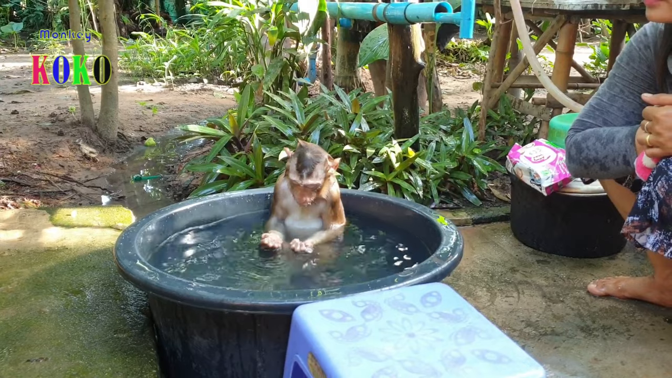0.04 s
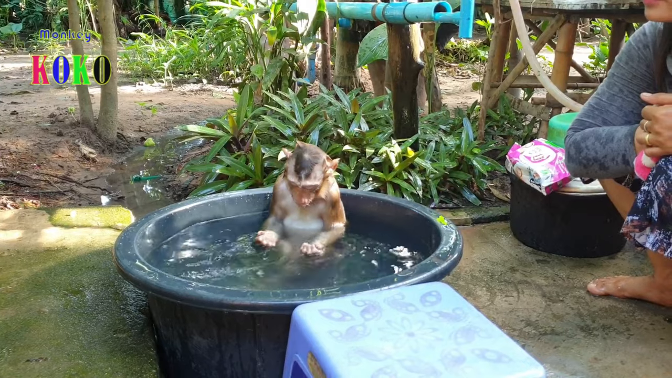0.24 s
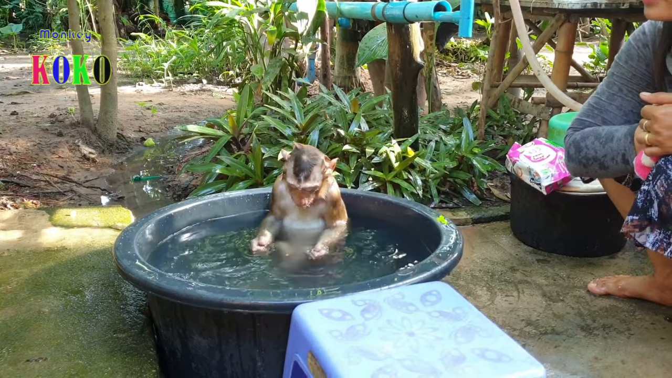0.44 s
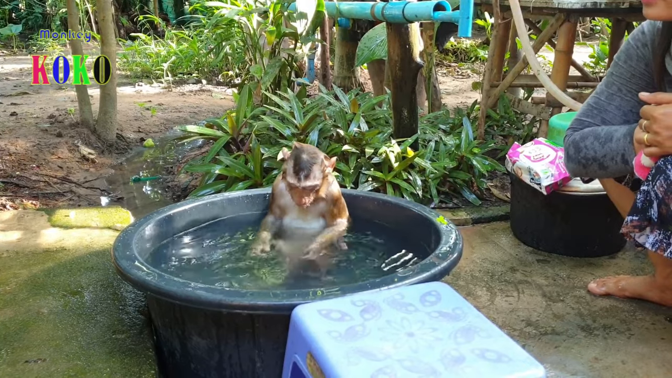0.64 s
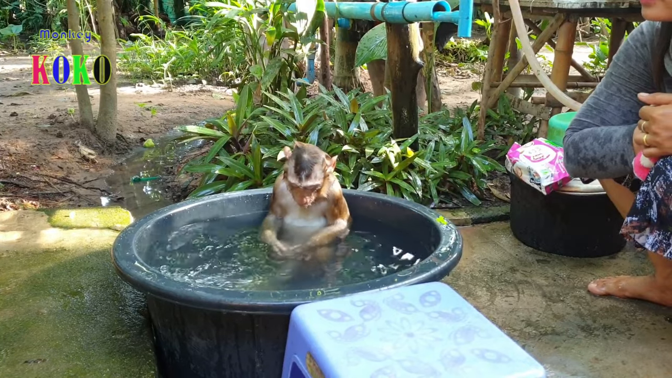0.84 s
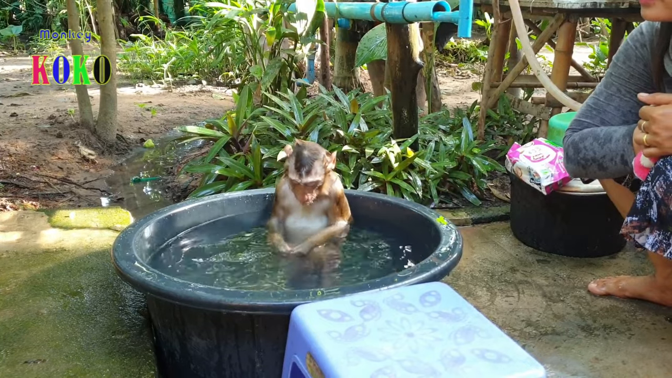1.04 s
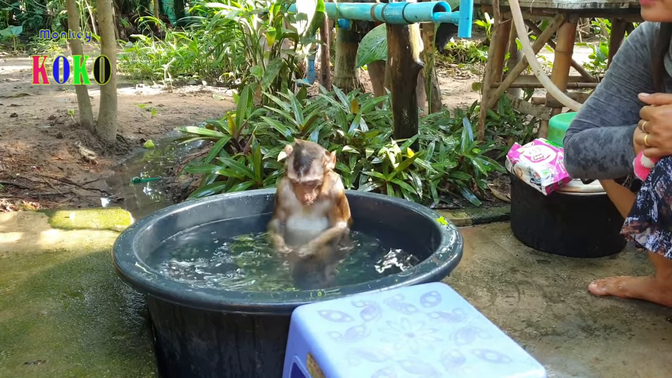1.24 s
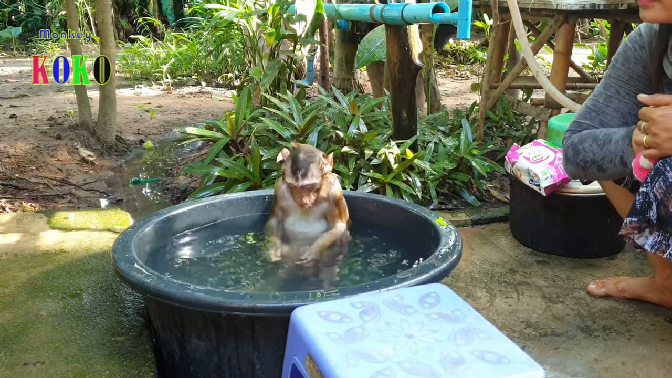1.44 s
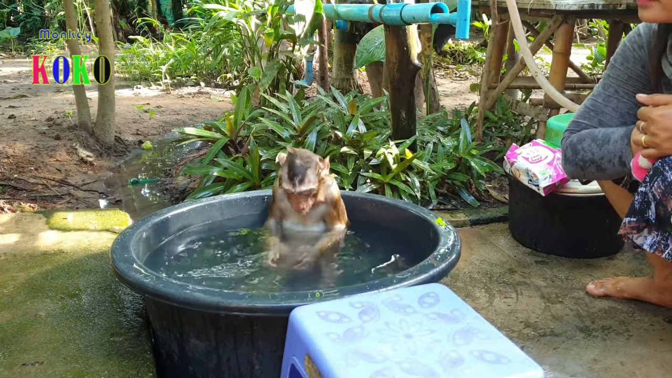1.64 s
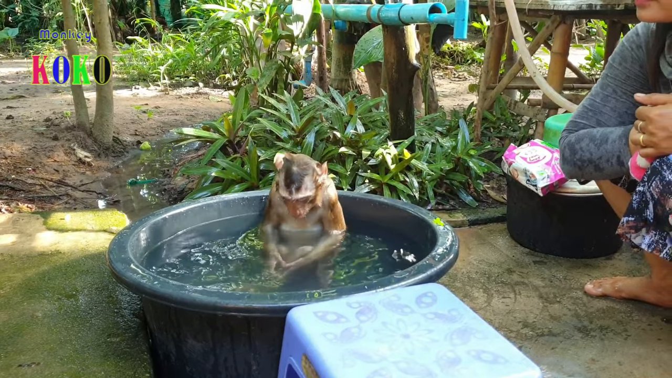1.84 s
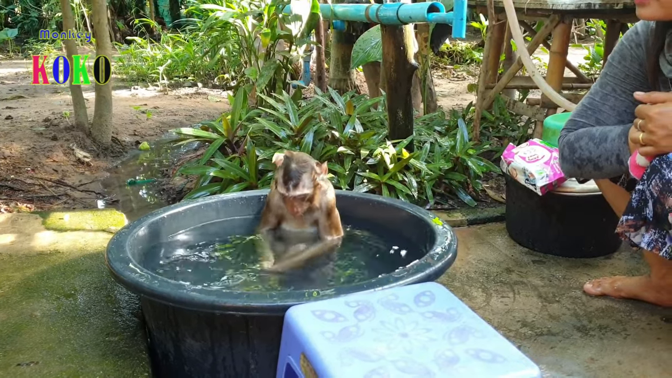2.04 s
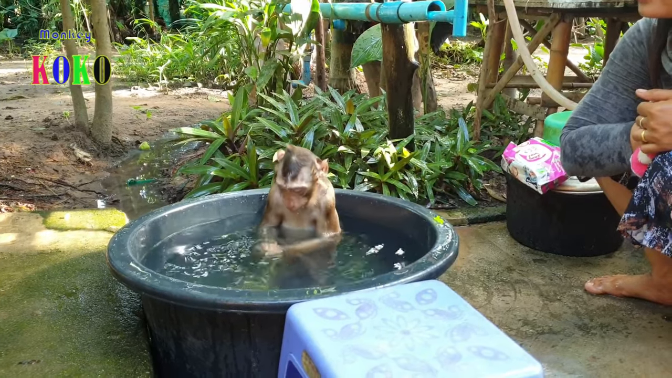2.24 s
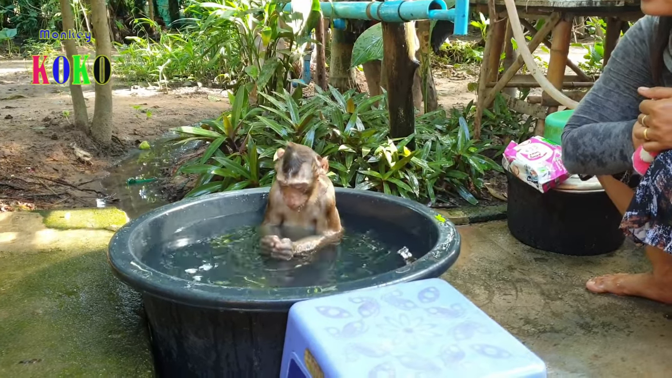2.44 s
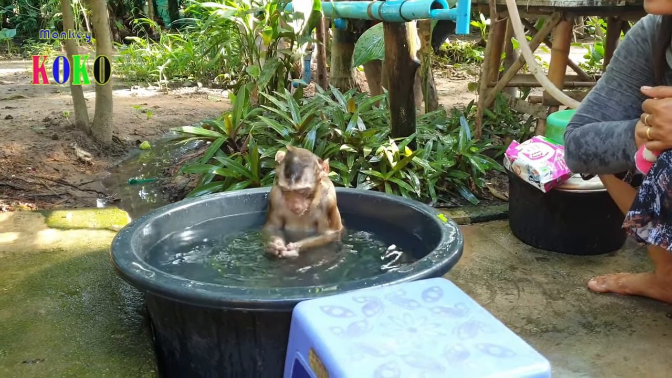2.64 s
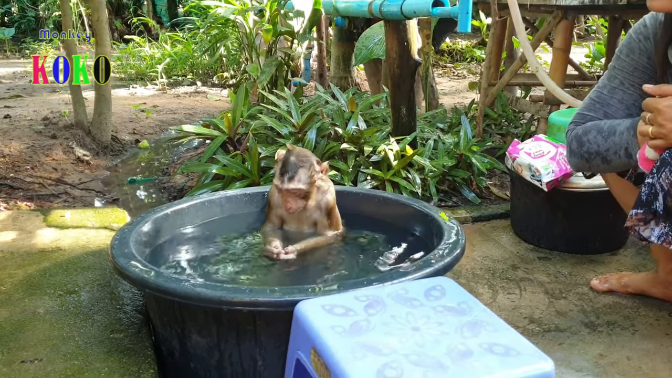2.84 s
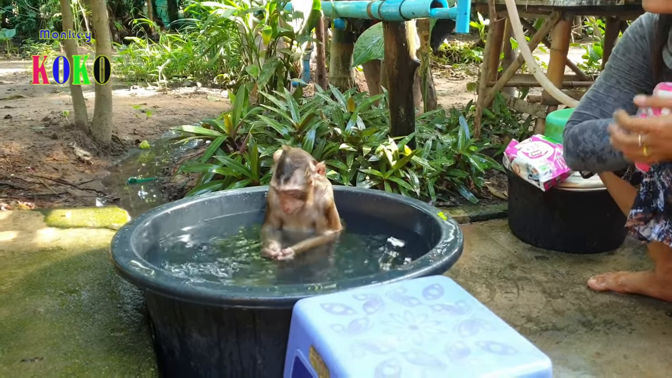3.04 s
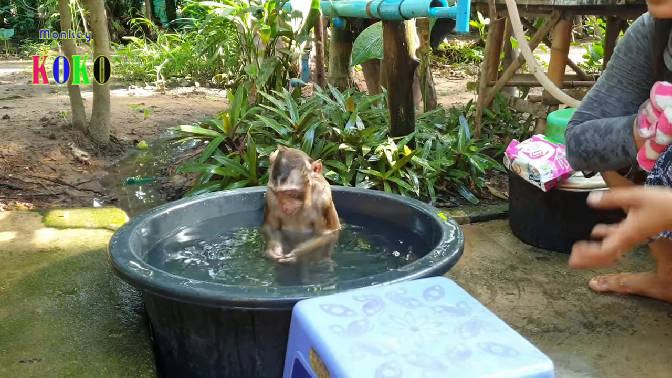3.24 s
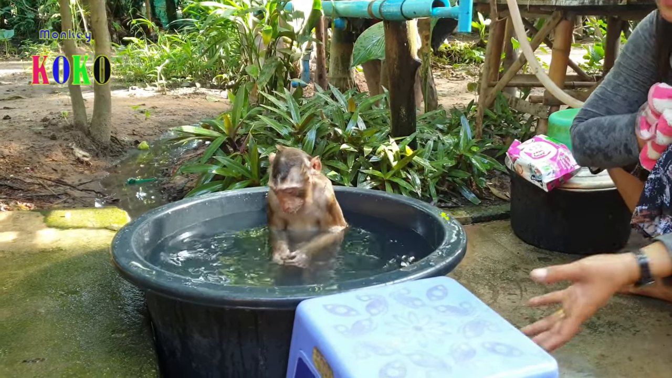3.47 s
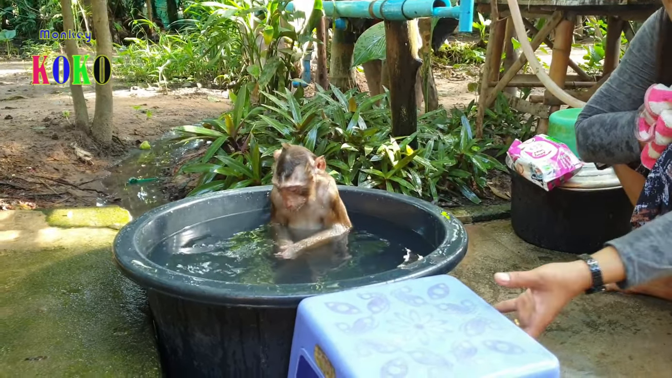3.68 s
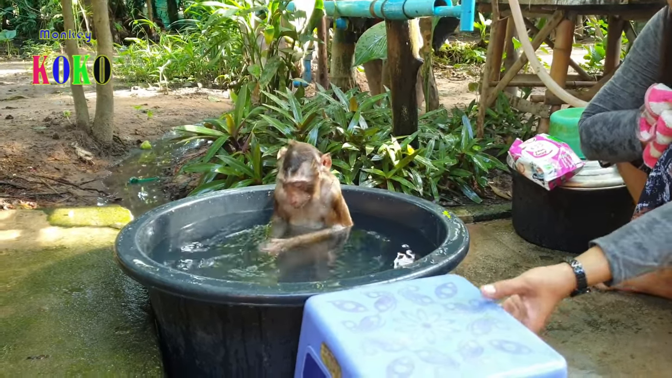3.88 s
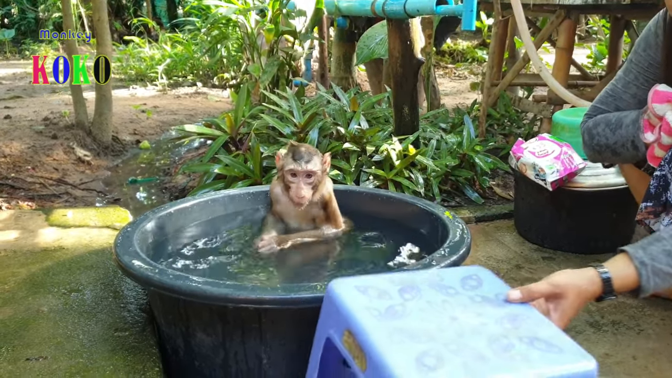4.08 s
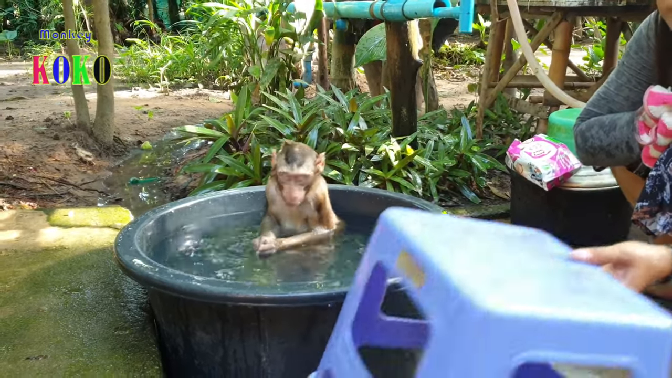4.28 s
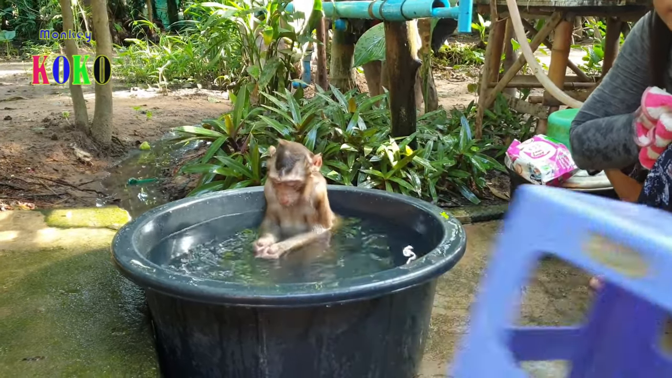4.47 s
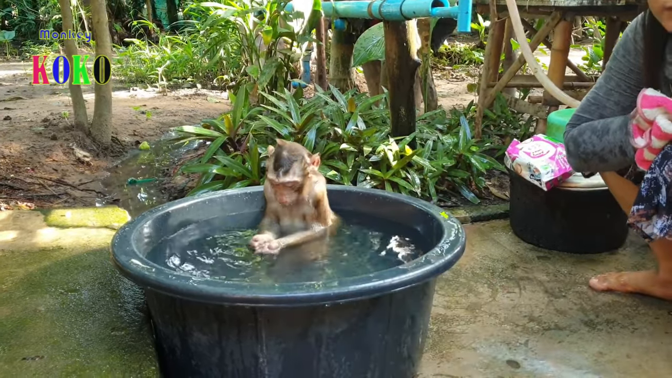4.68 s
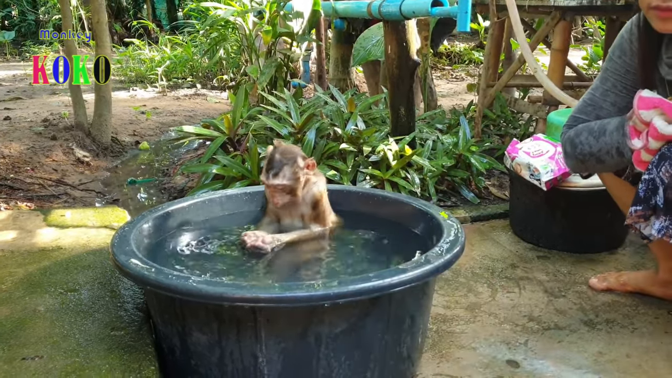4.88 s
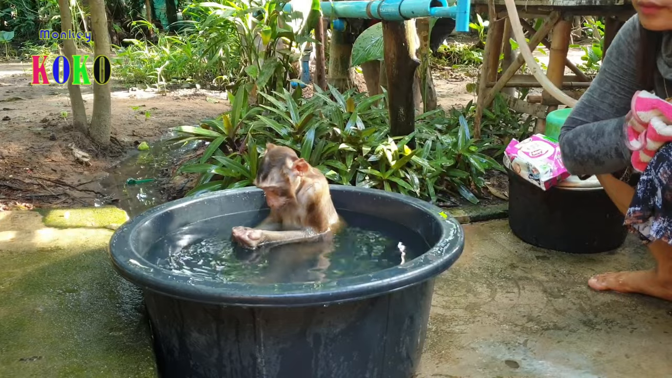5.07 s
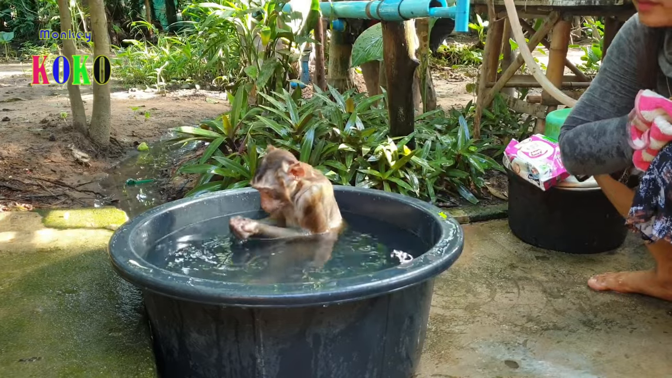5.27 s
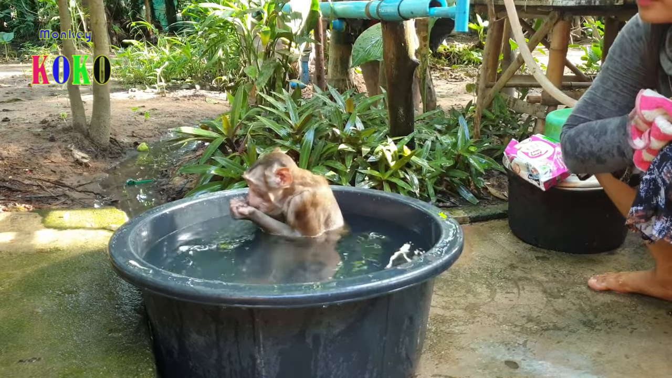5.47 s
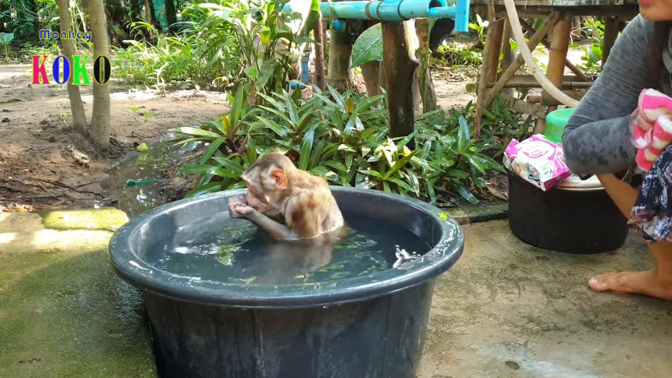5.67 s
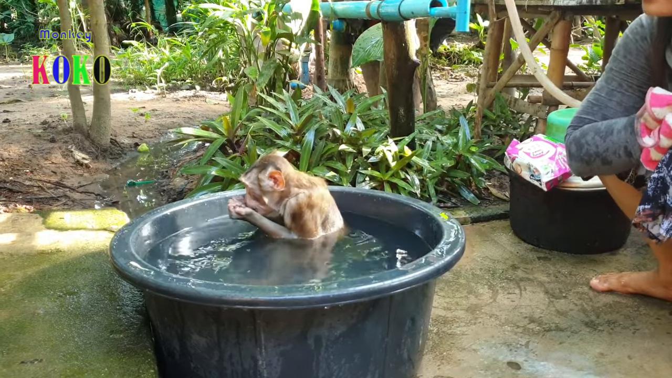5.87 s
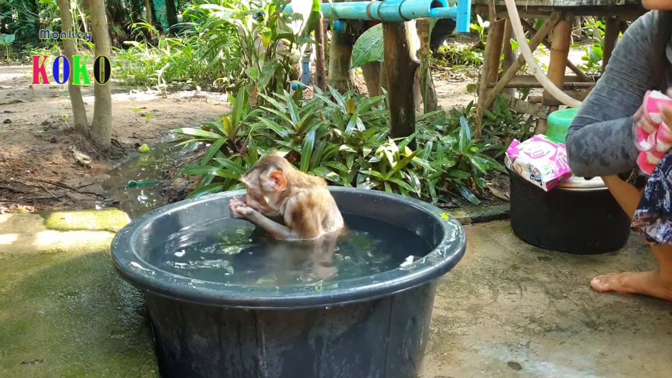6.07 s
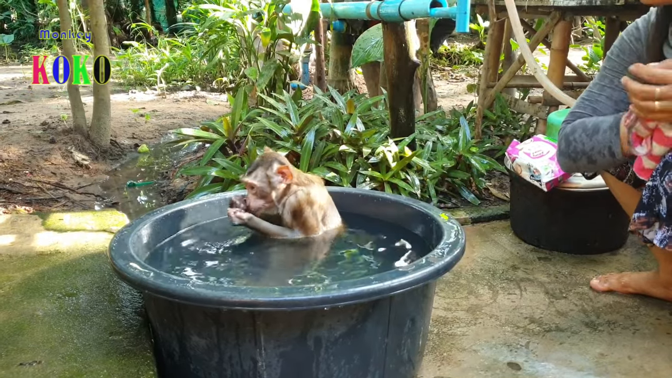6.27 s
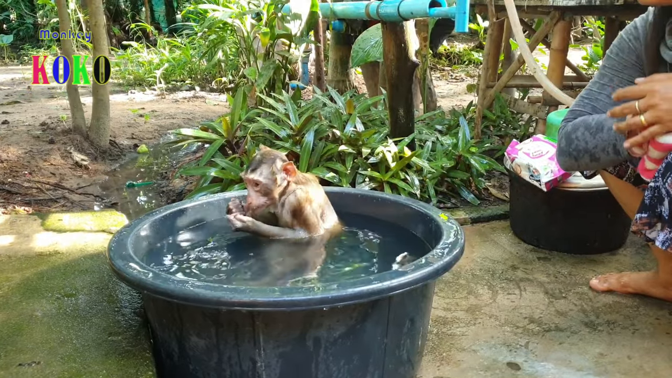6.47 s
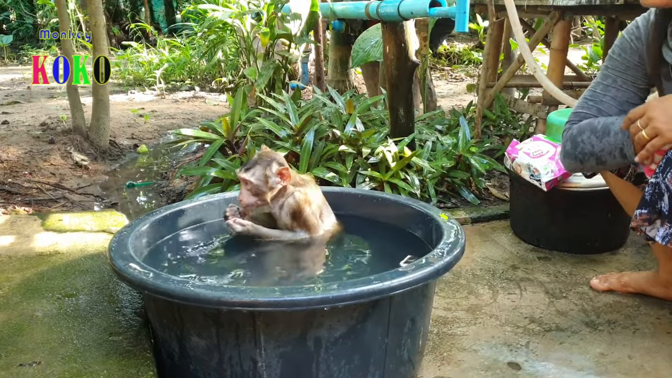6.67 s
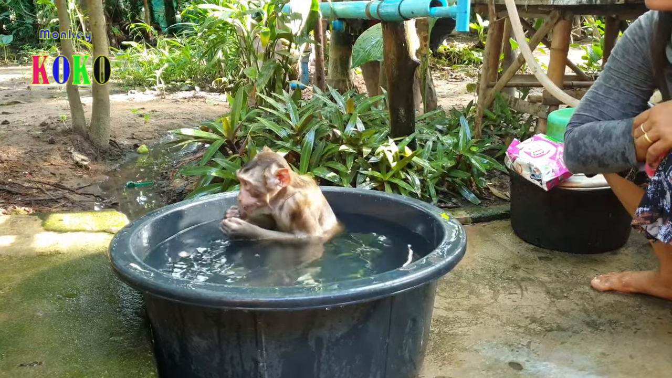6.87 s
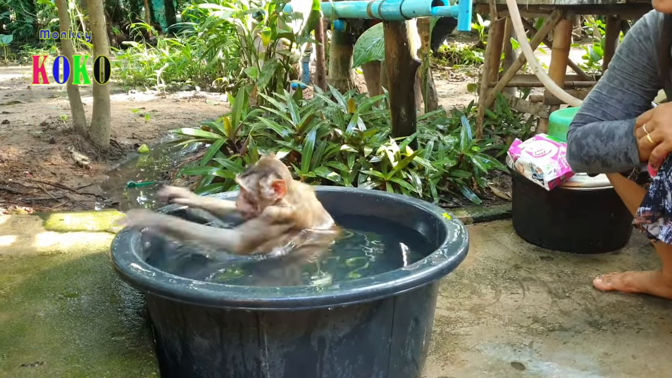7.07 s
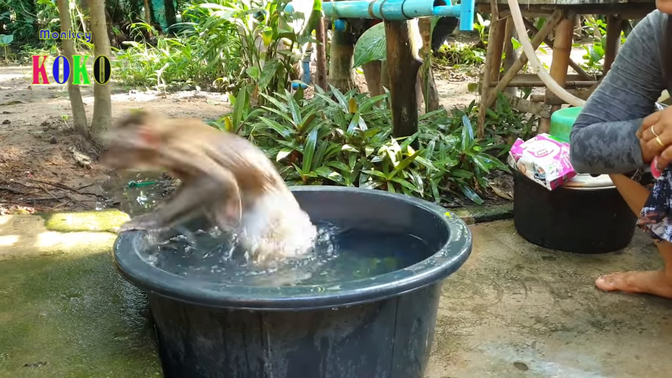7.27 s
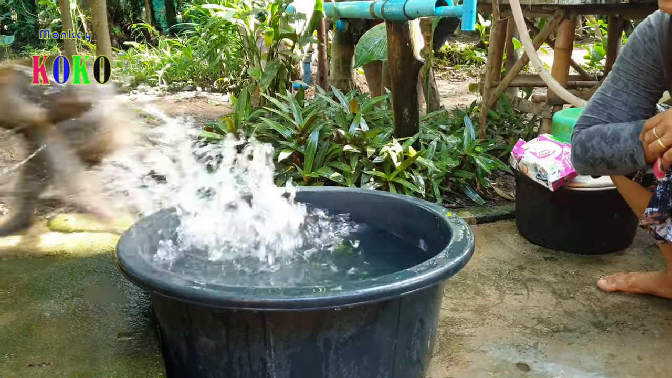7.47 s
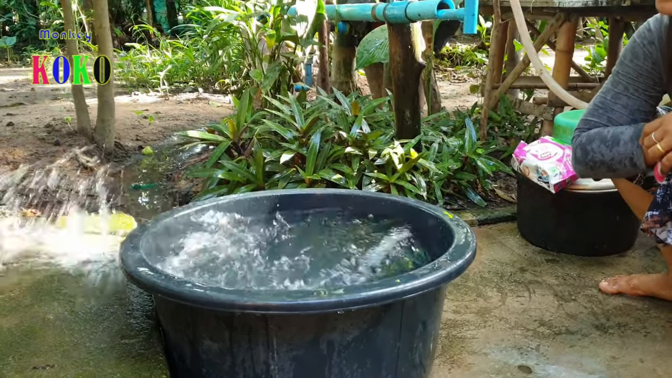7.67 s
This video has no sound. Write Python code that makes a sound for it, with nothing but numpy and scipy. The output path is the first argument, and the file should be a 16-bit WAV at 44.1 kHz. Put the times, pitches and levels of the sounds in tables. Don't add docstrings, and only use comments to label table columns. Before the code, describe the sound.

Close stereo microphone in open air: quick regular bird trills lean to the right, with brighter insect hiss and faint rumble around. Occasional distant croaks. A light water stir comes before a sharp plastic knock and short scrape; later crisp rustling and hollow bumps. At the end water erupts suddenly, with ringing bubbles, rising plops and raining spray, cut off while still splashing. A faint early double and leafy scatter soften everything.

```python
import sys
import numpy as np
from scipy import signal
from scipy.fft import rfft, irfft, next_fast_len
from scipy.io import wavfile
from scipy.ndimage import uniform_filter1d

SR = 44100
rng = np.random.default_rng(int(sys.argv[2]) if len(sys.argv) > 2 else 0)


def magnitude_from_level(level_db):
    exponent = np.asarray(level_db, float) / 20
    return 10 ** exponent


def master_out(mix):
    frames = np.transpose(np.atleast_2d(mix))
    ceiling = np.clip(frames, -1, 1)
    pcm = np.round(ceiling * 32767).astype(np.int16)
    wavfile.write(sys.argv[1], SR, pcm)


N = 340445


def in_time(rows):
    return np.interp(np.arange(N) / SR, *np.transpose(rows))


def at_hz(points):
    size = next_fast_len(N, True)
    hz = np.maximum(np.arange(size // 2 + 1) * SR / size, 1)
    table_hz, value = np.transpose(points)
    return np.interp(np.log(hz), np.log(table_hz), value)


def coloured(x, gain):
    size = next_fast_len(N, True)
    return irfft(rfft(x, size) * gain, size)[..., :N]


def unit(x):
    return x / np.sqrt(np.mean(x ** 2) + 1e-24)


def band(x, low_hz, high_hz, order=2):
    edges_hz = [low_hz, min(high_hz, .45 * SR)]
    return signal.sosfilt(signal.butter(order, edges_hz, "band", fs=SR, output="sos"), x)


def resonance(x, hz, width_hz):
    r = np.exp(-np.pi * width_hz / SR)
    poles = [1, -2 * r * np.cos(2 * np.pi * hz / SR), r * r]
    return signal.lfilter([(1 - r * r) / 2, 0, (r * r - 1) / 2], poles, x)


def ring(clicks, hz, t60):
    r, w = magnitude_from_level(-60 / (t60 * SR)), 2 * np.pi * hz / SR
    return signal.lfilter([0, np.sin(w)], [1, -2 * r * np.cos(w), r * r], clicks + 1e-18)


def drift(rate):
    knots = rng.standard_normal(int(N / SR * 60) + 2)
    return np.interp(np.arange(N) / SR * min(rate, 59), np.arange(len(knots)), knots)


def grains(per_s, spread_db):
    sizes = magnitude_from_level(spread_db * np.minimum(rng.exponential(1, N), 4)) * rng.choice([-1, 1], N)
    return sizes * (rng.random(N) < per_s / SR)


def swells(rows, round_top=0.81):
    s, db, rise, fall = np.transpose(rows)[:4, :, None]
    t = np.arange(0, N + 32, 32) / SR
    away = np.where(t < s, (s - t) / np.abs(rise), (t - s) / np.abs(fall))
    event_db = db - 20 * away ** round_top
    power = np.sum(magnitude_from_level(2 * np.maximum(event_db, -150)), axis=0) + 1e-12
    return np.interp(np.arange(N) / SR, t, 10 * np.log10(power))


def air_noise():
    # frequency in Hz, left-right likeness from 0 to 1.
    likeness = [(60, 0.95), (300, 0.73), (900, 0.079), (2000, 0.009), (15000, .01)]
    alike = np.clip(at_hz(likeness), 0, 1)
    mid, side = coloured(rng.standard_normal((2, N)), np.sqrt([1 + alike, 1 - alike]))
    return np.array([mid + side, mid - side]) / np.sqrt(2)


def placed(x, side):
    return coloured(x, magnitude_from_level(at_hz(side) / 2 * [[1], [-1]]))


def garden(x, direct_db, early_db, t60, late_db, late_t60):
    t = np.arange(SR) / SR
    crowd = magnitude_from_level(early_db - 60 * t / t60) / np.sqrt(t60)
    haze = magnitude_from_level(late_db - 60 * t / late_t60) / np.sqrt(late_t60)
    echoes = rng.standard_normal((2, SR)) * (crowd + haze) * np.sqrt(14 / SR)
    echoes[:, 0] = magnitude_from_level(direct_db)
    return signal.fftconvolve(x[None], echoes, axes=1)


def early(x):
    lead = 768
    return np.pad(x[..., lead:], ((0, 0), (0, lead)), mode="reflect")


def background():
    # time in seconds, level in dB.
    traffic = [(0, -54.5), (2.7, -54), (3.5, -52), (4.3, -56.5), (5.45, -52.5), (5.87, -58.5),
               (6.25, -52.5), (6.8, -57), (7.4, -53.5), (7.72, -55.5)]
    # time in seconds, level in dB.
    cicada = [(0, -73), (.43, -72.5), (1.12, -76), (1.72, -71), (2.15, -78.5), (2.9, -70.5), (3.2, -80),
              (4.04, -70.5), (4.32, -79), (5.3, -68.5), (5.63, -80.5), (5.9, -69), (6.8, -75.5),
              (7.72, -65)]
    # frequency in Hz, level in dB per Hz.
    rumble = [(18, -21), (30, -1.5), (60, -1), (117, -5), (640, -39.5), (1400, -45.5), (1950, -75),
              (3300, -120)]
    # centre in Hz, width in Hz, level in dB.
    insects = [(1770, 140, -80.5), (3390, 500, -74.5), (5175, 164, -76.5), (6635, 284, -78)]
    rumble_db, cicada_db = in_time(traffic), in_time(cicada)
    leaf_db = -80.5 + 0.1 * (cicada_db - cicada_db.mean())
    white = air_noise()

    def hiss(hz, width_hz):
        return unit(resonance(resonance(white, hz, width_hz), hz, width_hz))

    out = magnitude_from_level(rumble_db) * unit(coloured(air_noise(), magnitude_from_level(at_hz(rumble))))
    out += magnitude_from_level(cicada_db + 0.42 * drift(10)) * hiss(7110, 810)
    out += magnitude_from_level(leaf_db + 1.9 * drift(5)) * hiss(10630, 2100)
    for hz, width, db in insects:
        out += magnitude_from_level(db + 0.5 * drift(2.45)) * hiss(hz, width * 2.3)
    return out


def bird():
    # start in seconds, level in dB.
    trills = [(-0.052, -6.5), (0.238, -4), (0.528, -5), (0.808, -3), (1.132, -3.5), (1.428, -4.5),
              (1.754, -3.5), (2.016, -4.5), (2.3, -2.3), (2.629, -3.5), (2.912, -3.3), (3.201, -4.5),
              (3.483, -1.5), (3.753, -1), (4.037, -0.5), (4.357, -0.5), (4.672, -2.2), (4.944, -2),
              (5.226, -1.5), (5.502, -4), (5.785, -4.5), (6.071, -1.5), (6.343, -1.5), (6.627, -2.7),
              (6.907, -2), (7.24, 4)]
    # seconds after its start, bottom of the sweeps in Hz, level in dB.
    shape = [
        (0.001, 3760, -65),
        (.019, 3470, -50),
        (.045, 3070, -48),
        (.075, 2505, -47),
        (0.105, 2265, -53.5),
        (.135, 2225, -58.5),
        (0.158, 2300, -65),
    ]
    sweeps_per_s = 210
    top_hz, top_sag_hz_per_s, sag_from_s = 3960, 3800, .03
    lead = SR // 4
    song = np.zeros(N + SR)
    s, bottom, level_db = np.transpose(shape)
    t = np.arange(s[0], s[-1], 1 / SR)
    bottom_hz, swell_db = np.interp(t, s, bottom), np.interp(t, s, level_db)
    top = top_hz - top_sag_hz_per_s * np.maximum(t - sag_from_s, 0)
    chance = rng.standard_normal((len(trills), 36))
    for (start, db), own in zip(trills, chance):
        pace = sweeps_per_s * np.exp(.3 * np.interp(t, np.linspace(s[0], s[-1], 35), own[1:]))
        part = np.cumsum(pace / SR) % 1
        hz = top + (bottom_hz * (1 + 0.01945 * own[0]) - top) * part ** 1.1
        pulse = np.minimum(1.87 * np.sin(np.pi * part), 1)
        note = magnitude_from_level(db + swell_db) * pulse * np.sin(2 * np.pi * np.cumsum(hz) / SR)
        i = lead + round((start + s[0]) * SR)
        song[i:i + len(t)] += note
    song = band(song, 2250, 3870, order=10)
    return garden(song, -3.9, -3.0, 0.18, -9.5, 0.75)[:, lead:lead + N]


def fowl():
    # peak in seconds, level in dB, rise and fall in seconds per 20 dB.
    croaks = [(0.04, -72, 0.054, 0.071), (0.9, -53.5, .16, 0.18), (1.232, -63.5, 0.05, .11),
              (1.568, -70, 0.041, 0.21), (2.2, -70, 0.052, .15), (2.35, -53, 0.15, 0.2),
              (4.10, -52, 0.23, .17), (4.53, -68, .05, 0.18), (5.96, -68.5, 0.073, 0.103),
              (6.125, -54, 0.14, 0.13), (6.486, -65.5, 0.041, 0.11)]
    # centre in Hz, width in Hz, level in dB.
    throat = [(560.3, 270, -3.5), (864, 103, 3), (988, 291, 11), (1960, 150, -6.5)]
    croak_hz = 551.5
    level_db = swells(croaks, round_top=1.7)
    effort = np.clip(uniform_filter1d(level_db, SR // 25) + 60, -12, 0)
    hz = croak_hz * (1 + .009 * effort + .008 * drift(30))
    turns = 2 * np.pi * np.cumsum(hz / SR)
    tone = (np.sin(2 * turns) + .12 * np.sin(turns)) * magnitude_from_level(3.5 * drift(55) + .8 * effort)
    breath = rng.standard_normal(N) * magnitude_from_level(5.4 * drift(58))
    hoarse = sum(magnitude_from_level(db) * resonance(resonance(breath, hz, width), hz, width) for hz, width, db in throat)
    voice = tone + 1.1 * unit(hoarse)
    return garden(magnitude_from_level(level_db) * voice, -4.0, -1.5, 0.093, -16, 0.86)[:, :N]


def rustle():
    # peak in seconds, level in dB, rise and fall in seconds per 20 dB, dull part in dB.
    brushes = [(.558, -68.5, .03, 0.048, -21), (.64, -71.5, 0.28, 0.097, -14),
               (2.774, -64, 0.085, 0.17, 10.5), (3.036, -62, 0.13, .14, -7), (3.908, -60, 0.067, 0.027, -6),
               (3.925, -65.5, 0.029, 0.19, 1), (5.03, -66, 0.051, 0.22, 1), (5.301, -44, 0.007, 0.041, -23),
               (5.34, -62, 0.073, 0.23, 5), (5.432, -43, 0.0088, 0.036, -15),
               (5.478, -49, 0.18, 0.063, -2.5), (5.56, -58.5, 0.16, .11, 3), (5.869, -81, 0.074, 0.48, -10),
               (6.11, -50, 0.011, 0.031, -11), (6.16, -60.5, 0.097, 0.59, 3),
               (6.34, -58.5, 0.66, 0.19, -6.5), (6.84, -62, 0.14, 0.11, -3.5),
               (6.99, -69, 0.055, 0.083, -3), (7.2, -58.5, 0.098, 0.057, 2)]
    # peak in seconds, level in dB, rise and fall in seconds per 20 dB.
    sniff = [
        (.93, -66, 0.022, 0.23),
        (1.03, -62, 0.16, .18),
        (1.235, -91, .15, 0.024),
    ]
    dull_brushes = [(s, db + dull_db, rise, fall) for s, db, rise, fall, dull_db in brushes]
    bright = magnitude_from_level(swells(brushes, round_top=1.06))
    dull = magnitude_from_level(swells(dull_brushes, round_top=0.92))
    fibres = air_noise() * magnitude_from_level(2.0 * drift(50))
    puff = magnitude_from_level(swells(sniff)) * unit(band(fibres, 12100, 12600) + 0.5 * band(fibres, 8740, 11300))
    weave = magnitude_from_level(-13.5) * unit(resonance(fibres, 7050, 760))
    return puff + bright * (unit(band(fibres, 5830, 11860)) + weave) + dull * unit(band(fibres, 2200, 7400))


def bubbles(level_db, low_hz, high_hz, per_s, cycles):
    busy = level_db > -115
    clicks = grains(per_s * magnitude_from_level(6 * drift(40)), 3.6)[busy]
    dealt = rng.integers(0, 16, N)[busy]
    pitches = np.geomspace(low_hz, high_hz, 16)
    cloud = sum(ring(clicks * (dealt == k), hz, cycles / hz) for k, hz in enumerate(pitches))
    out = np.zeros(N)
    out[busy] = unit(band(cloud, 0.54 * low_hz, 1.46 * high_hz))
    return magnitude_from_level(level_db) * out


def splash():
    # peak in seconds, level in dB, rise and fall in seconds per 20 dB.
    slosh = [
        (2.765, -54, 0.088, .2),
        (2.8, -59, 0.057, 0.073),
        (2.88, -81, 0.088, 0.18),
    ]
    # peak in seconds, level in dB, rise and fall in seconds per 20 dB.
    big = [
        (7.165, -58.5, 0.051, .3),
        (7.26, -45, 0.046, 0.037),
        (7.36, -29.5, 0.057, .12),
        (7.44, -32.5, 0.054, 0.25),
        (7.535, -37, 0.13, 0.14),
        (7.72, -39.5, 0.11, .1),
    ]
    # peak in seconds, level in dB, rise and fall in seconds per 20 dB.
    small = [
        (7.165, -54, 0.048, 0.19),
        (7.335, -27, 0.054, .3),
        (7.485, -30.5, .05, 0.066),
        (7.55, -37, 0.037, 0.16),
        (7.69, -44, .1, 0.11),
    ]
    # peak in seconds, level in dB, rise and fall in seconds per 20 dB.
    spray = [
        (7.16, -65.5, 0.055, .2),
        (7.224, -59, .12, 0.061),
        (7.39, -28.5, 0.11, 0.45),
        (7.552, -32.5, .05, 0.2),
        (7.72, -25.5, 0.27, .1),
    ]
    # start in seconds, peak in dB, pitch in Hz, snap in dB.
    plops = [(7.08, -38, 2390, -12), (7.153, -40, 2570, -14), (7.164, -28.5, 2470, -8.5),
             (7.194, -46, 2960, 12), (7.229, -40, 1020, -17), (7.246, -27.5, 993, -26),
             (7.258, -31, 870, -17), (7.289, -13, 2960, -12.5), (7.319, -16.5, 872, 0),
             (7.329, -12, 1170, -5.5), (7.345, -10, 920, -11), (7.359, -11.5, 980, -9),
             (7.367, -13, 1190, -20), (7.391, -15.5, 900, -6), (7.408, -21, 3000, 9),
             (7.438, -22, 1750, 10.5), (7.457, -17, 2540, -12), (7.479, -11, 2535, -9),
             (7.495, -16.5, 2430, 2.5), (7.524, -28.5, 511, 8), (7.548, -18, 3000, 13),
             (7.577, -16.5, 2500, 0), (7.667, -29, 3000, 15), (7.693, -17, 2800, 6.5),
             (7.714, -19, 3160, -24),
             (7.391, -21, 860, -32),
        (7.456, -24.5, 528, -30),
        (7.525, -23.5, 549, -30),
        (7.534, -34, 576, -30),
    ]
    big_db, small_db = swells(big, round_top=0.86), swells(small, round_top=1.03)
    spray_db, slosh_db = swells(spray, round_top=1.14), swells(slosh)
    out = np.ones((2, 1)) * bubbles(big_db, 723, 1470, 600, 20.6)
    out += [bubbles(small_db, 1250, 3600, 1700, 7.9), bubbles(small_db, 1515, 4350, 1600, 29)]
    out += [bubbles(slosh_db, 1760, 5100, 7100, 10.0), bubbles(slosh_db, 1770, 3530, 5400, 22)]
    out += bubbles(slosh_db - 12.5, 390, 990, 2000, 8.5)
    drops = air_noise() + .25 * np.array([grains(2500, 4.5), grains(2500, 4.5)])
    out += magnitude_from_level(spray_db + 2.4 * drift(55)) * unit(band(drops, 2640, 13600))
    t = np.arange(SR // 20) / SR
    snap = unit(band(rng.standard_normal((2, N)), 5600, 12200))
    for s, peak_db, hz, snap_db in plops:
        i = round(s * SR)
        size = min(len(t), N - i)
        rising = np.sin(2 * np.pi * hz * t * (1 + 4.0 * t))
        plop = rising * np.exp(-t * hz / 5.0) * np.minimum(t * hz / 1.5, 1)
        burst = magnitude_from_level(snap_db - 6) * np.exp(-t / .005)
        out[:, i:i + size] += magnitude_from_level(peak_db - 3.5) * (plop[:size] + burst[:size] * snap[:, i:i + size])
    lag = 6
    return np.array([out[0], np.pad(out[1], (lag, 0))[:N]])


def stool():
    # peak in seconds, level in dB, rise and fall in seconds per 20 dB.
    drags = [
        (3.903, -42.5, 0.045, 0.035),
        (3.952, -48.5, 0.061, 0.11),
        (5.33, -51, 0.029, .2),
        (5.44, -46, .1, 0.038),
        (5.487, -44, 0.033, 0.067),
    ]
    # time in seconds, peak in dB, boom in dB, crack in dB.
    knocks = [
        (3.871, -45, -17, -17),
        (3.897, -14.5, -30, -41),
        (3.937, -29, -26, -31),
        (3.982, -22.5, -34, -35),
        (5.297, -31, 7, -3),
        (5.389, -42, -14, -21),
        (5.433, -23.5, -11.5, -12.5),
        (5.46, -27, -5, -11),
        (5.481, -17.5, -34, -24),
    ]
    # seconds later, level in dB.
    contact = [
        (0, -3),
        (.0017, -11),
        (.0045, -5.5),
    ]
    # frequency in Hz, level in dB, 60 dB decay in seconds.
    shell = [(326, -7.5, 0.0088), (430, 5.5, 0.01), (626, -3, 0.022), (877, -4.5, 0.023),
             (1404, -9.5, 0.017), (1770, -6.5, 0.034), (2300, -8.5, 0.011)]
    # frequency in Hz, level in dB, 60 dB decay in seconds.
    hollow = [(130, -2, 0.11), (183, 3.5, 0.078), (201.3, -5.5, 0.24)]
    s, peak_db, boom_db, crack_db = np.transpose(knocks)
    at, out = np.round(s * SR).astype(int), np.zeros(N)
    drag = magnitude_from_level(swells(drags, round_top=1.0)) * unit(grains(900, 2.0))
    for modes, blow_db, drag_db in ((shell, peak_db - 14.5, -22), (hollow, peak_db + boom_db - 9.5, -32)):
        for hz, db, t60 in modes:
            clicks = magnitude_from_level(db + drag_db) * drag
            for later, touch_db in contact:
                size = magnitude_from_level(blow_db + db + touch_db + rng.normal(0, 2.5, len(at)))
                clicks[at + round(later * SR)] += size * rng.choice([-1, 1], len(at))
            out += ring(clicks, hz, t60)
    cracks = np.zeros(N)
    cracks[at] = magnitude_from_level(peak_db + crack_db - 2.5)
    crack_decay = signal.lfilter([1], [1, -magnitude_from_level(-60 / (.05 * SR))], cracks)
    crack = crack_decay * unit(band(air_noise(), 1500, 16000))
    return out + magnitude_from_level(4.0) * band(drag, 260, 2100) + crack


def scene():
    # frequency in Hz, left minus right in dB.
    far_side = [(60, -3.5), (180, -2.0), (550, 0), (1650, -12), (4970, -12), (15000, -15.5)]
    # frequency in Hz, left minus right in dB.
    near_side = [(60, -2.5), (700, -1.5), (1300, -2), (2400, -7), (4400, -4), (8100, -6), (15000, -8)]
    double_db = dict(air=-3., calls=-11.5, close=-11, close_bass=-13.5)
    air, calls = placed(background(), far_side), placed(bird() + fowl(), far_side)
    close = placed(rustle(), far_side) + placed(splash() + stool(), near_side)
    farther = magnitude_from_level(double_db["air"]) * air + magnitude_from_level(double_db["calls"]) * calls
    farther += magnitude_from_level(double_db["close"]) * close
    farther += magnitude_from_level(double_db["close_bass"]) * band(close, 81, 340)
    return 0.97 * air + calls + close + early(farther)


def top_cut(x):
    return signal.sosfilt(signal.butter(12, 16690, fs=SR, output="sos"), x)


def record(dry):
    # centre in Hz, width in Hz, level in dB.
    microphone = [(2820, 1640, 3), (4720, 710, -2), (7120, 780, 3), (8290, 590, -13.5), (8740, 880, -10.5),
                  (9260, 890, -3.5), (11150, 790, 4.5)]
    x = signal.sosfilt(signal.butter(6, 41, "high", fs=SR, output="sos"), dry)
    for hz, width, db in microphone:
        x = x + (magnitude_from_level(db) - 1) * resonance(x, hz, width)
    x = signal.sosfilt(signal.cheby2(16, 50, 15950, fs=SR, output="sos"), x)
    return top_cut(0.75 * x)


dry = scene()
out = record(dry)
master_out(out)
```